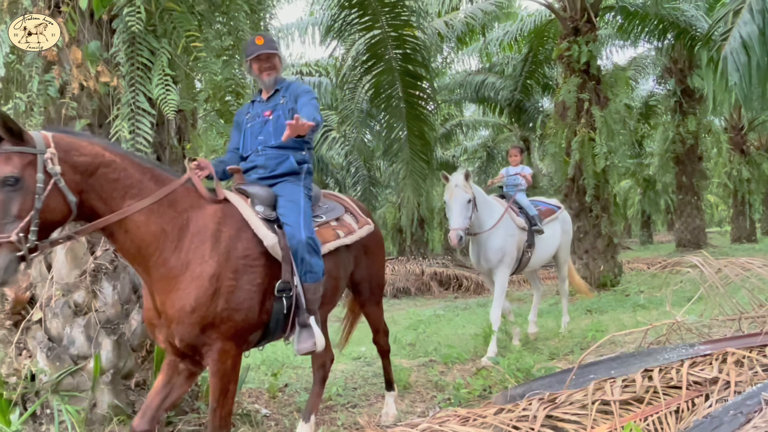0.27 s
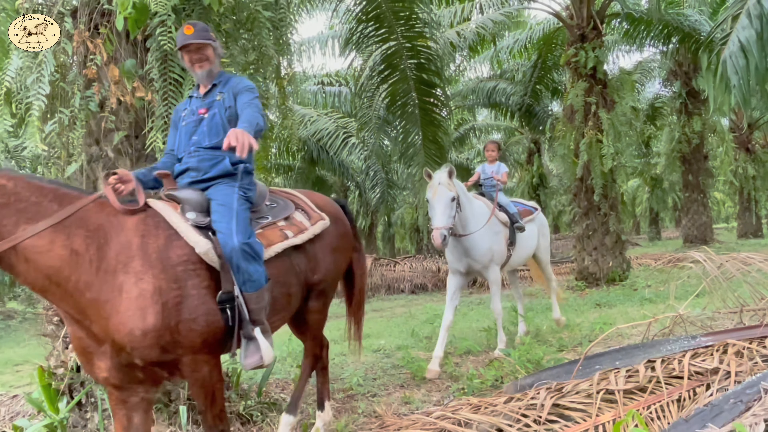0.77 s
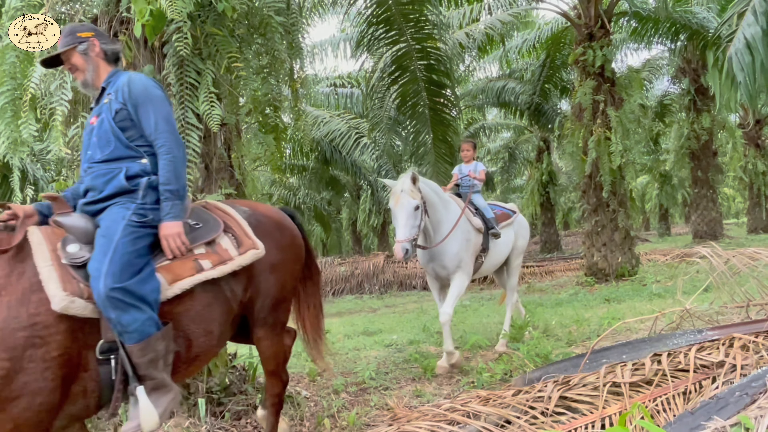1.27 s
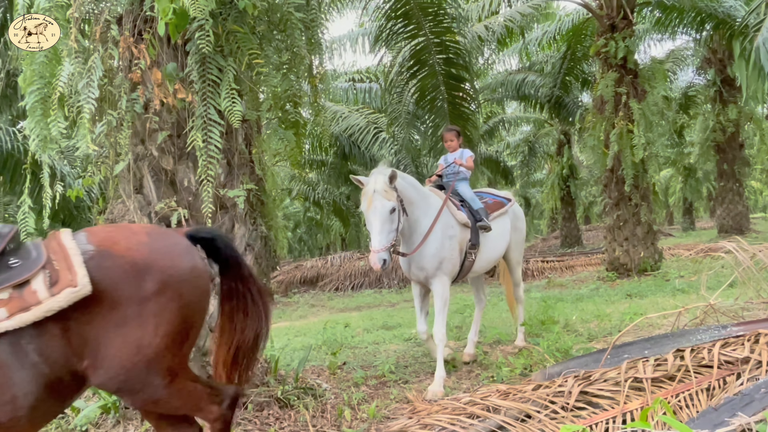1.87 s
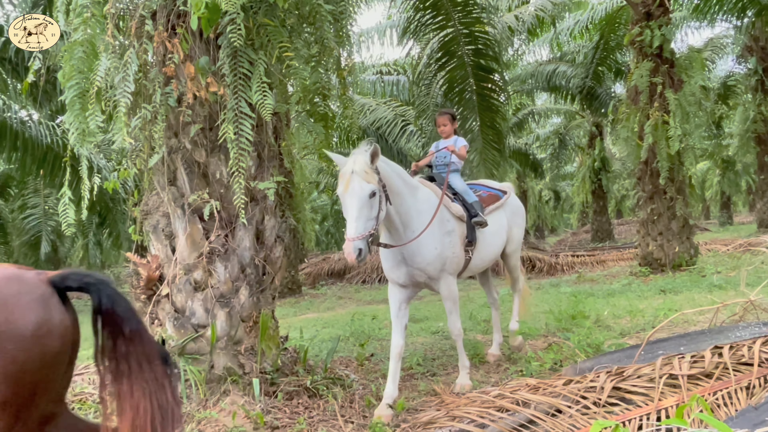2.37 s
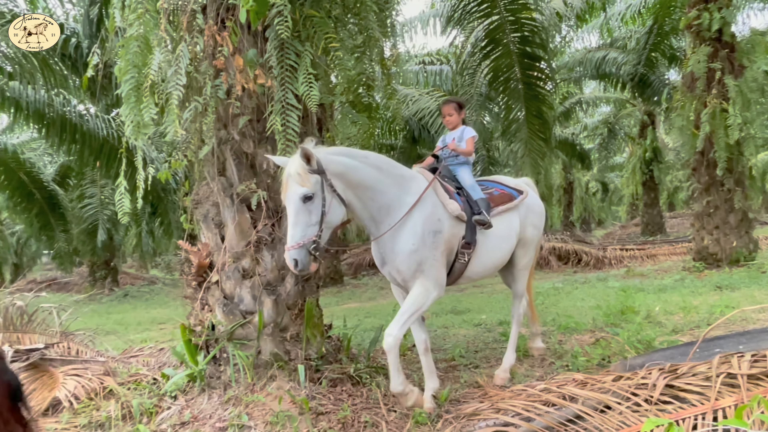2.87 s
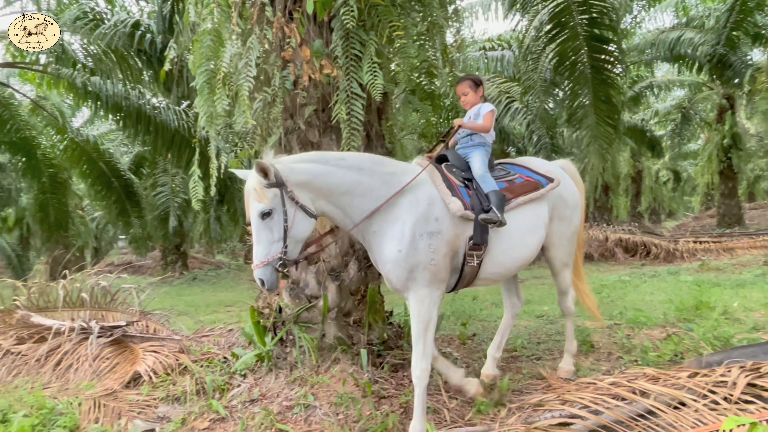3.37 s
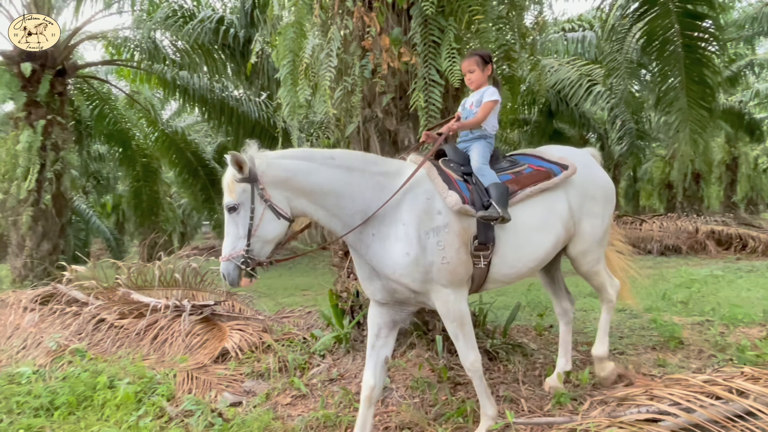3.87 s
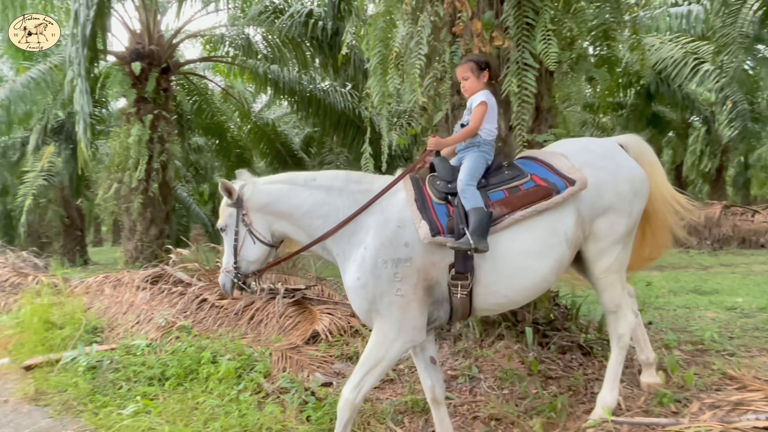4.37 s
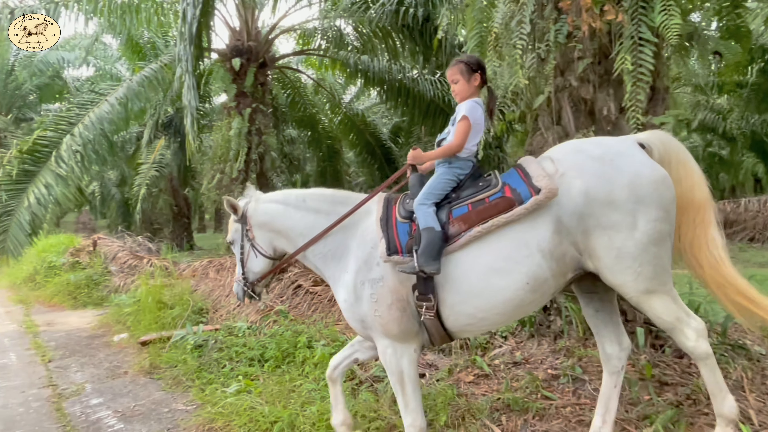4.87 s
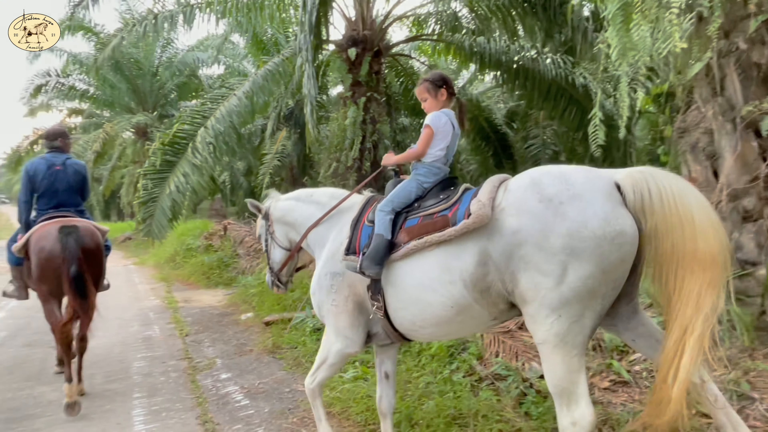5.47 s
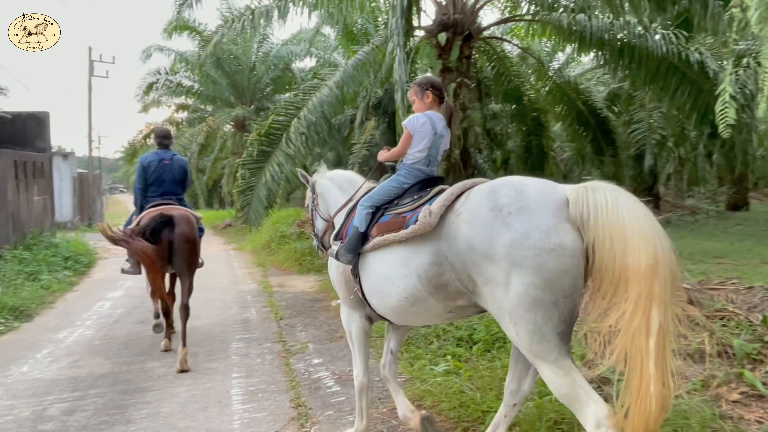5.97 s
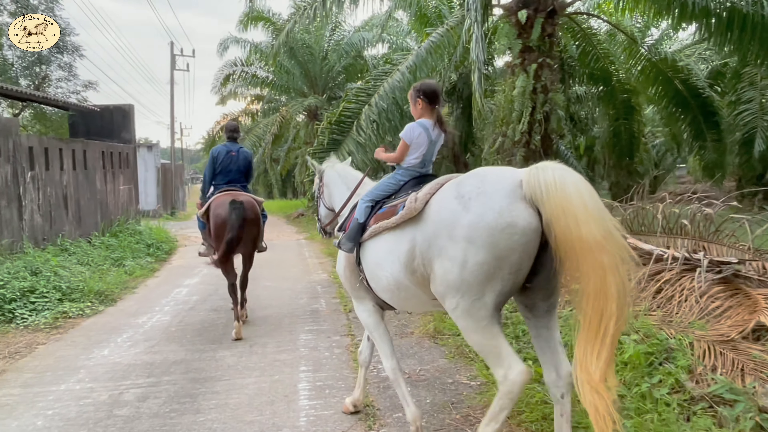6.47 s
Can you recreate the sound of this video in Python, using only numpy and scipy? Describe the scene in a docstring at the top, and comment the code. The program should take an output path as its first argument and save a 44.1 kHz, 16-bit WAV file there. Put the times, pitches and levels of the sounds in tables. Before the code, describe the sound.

Two horses walk past a stereo microphone in a palm grove, with a faint, low rumble wavering far off throughout. For the first two seconds their legs swish through grass and dry fronds, slightly to the left, and twigs snap, with a sharp crack near 0.8 seconds. A very faint, thin whistle sounds in the distance just after 1 second. From about 2 seconds the hooves land harder, thudding unevenly on soil, sliding over grit and crushing dry stems while the leaves keep rustling. From about 4 seconds the horses come out onto a paved lane, and the steps become hollow clops that ring slightly longer, mixed with crackles and short scrapes. The strongest clops fall near 4.7 and 6 seconds. Toward the end, around 6.5 seconds, the clops shift to the right and the bright rustle fades as the horses walk on.

```python
"""Two horses walk past a stereo microphone in a grove, with a low rumble far off throughout.
First their legs swish through grass and dry fronds and twigs snap; a faint whistle sounds in the distance.
From about 2 s the hooves land harder, thudding on soil, sliding over grit and crushing dry stems.
From about 4 s they come out onto a paved lane, where the hollow hooves ring longer as they clop.
At the end the clops move to the right and the top band fades as the horses walk off."""
import sys
import numpy as np
from scipy import signal
from scipy.fft import rfft, irfft
from scipy.io import wavfile
from scipy.ndimage import uniform_filter1d, map_coordinates

SR = 44100
rng = np.random.default_rng(int(sys.argv[2]) if len(sys.argv) > 2 else 0)


def pcm_store(signal):
    """Save signal as 16-bit PCM."""
    levels = np.round(np.clip(np.atleast_2d(signal), -1, 1) * 32767)
    wavfile.write(sys.argv[1], SR, levels.astype(np.int16).T)


N = 296793

PAVING_FROM_S = 3.9
# The bright colour of rustles and snaps as heard through the microphone.
# Each row: frequency in Hz, spectral level in dB.
RUSTLE_SPECTRUM = [(710, -18), (1200, -10.5), (1600, -14), (2400, -8.5), (3400, -9.5), (4700, -11.5),
                   (5900, -5), (7000, -7), (9300, -4), (10100, -2), (10700, 1), (11600, 2), (12600, -7.5),
                   (13300, -43), (16000, -9.5)]
# Grit stirring underfoot between the slides. Each row: time in seconds, level in dB.
SHUFFLE_LEVEL = [(0, -58), (.7, -59.5), (1.4, -52.5), (2.3, -58.5), (3.4, -58), (4.3, -58), (5.3, -46),
                 (5.5, -61), (5.66, -59), (6.15, -69.5), (6.4, -72.5), (6.73, -69)]


def thuds():
    """The ground swings a few times, its pitch sinking as the hoof settles; crushed soil roughens it."""
    # Weight landing. Each row: start in seconds, level in dB, first pitch in Hz, last pitch in Hz.
    landings = [(0.819, -37.5, 372, 172), (1.937, -17, 560, 134), (1.9507, -18, 413, 92),
                (2.587, -26, 640, 193), (2.596, -27.5, 450, 110), (2.763, -25.5, 560, 178),
                (2.864, -21, 680, 137), (2.929, -35.5, 300, 136), (3.199, -36.5, 560, 178),
                (3.365, -35.5, 413, 203), (3.486, -27, 630, 130), (4.069, -29.5, 630, 160),
                (4.431, -32, 540, 296), (4.449, -29, 304, 117), (4.46, -31.5, 231, 121),
                (4.622, -35.5, 540, 353), (4.663, -20, 560, 394), (4.684, -35, 254, 111),
                (5.004, -38, 246, 140), (5.06, -21.5, 440, 123), (5.079, -23.5, 430, 99),
                (5.092, -29, 150, 96), (5.159, -37, 476, 251), (5.267, -31, 634, 346),
                (5.282, -29.5, 207, 137), (5.296, -31.5, 171, 126), (5.627, -33, 635, 350),
                (5.634, -30.5, 580, 210), (5.676, -29.5, 254, 111), (5.698, -28.5, 284, 113),
                (5.714, -32, 199, 119), (5.799, -39.5, 298, 150), (5.883, -36.5, 480, 151),
                (5.901, -34.5, 297, 129), (6.0, -14.5, 625, 250), (6.014, -21, 330, 88.3),
                (6.044, -36, 200, 110), (6.251, -33.5, 247, 158), (6.324, -20, 460, 186),
                (6.379, -35, 348, 151), (6.43, -33.5, 246, 94), (6.467, -35, 254, 129),
                (6.682, -26, 277, 100), (6.696, -30, 232, 121)]
    sink_s, packed_hz, deep_hz = 0.0056, 455, 100
    out, t = np.zeros((2, N)), np.arange(round(.3 * SR)) / SR
    soil_band = signal.butter(2, [130, 600], "band", fs=SR, output="sos")
    jerk_band = signal.butter(2, 70, fs=SR, output="sos")
    for s, db, first_hz, last_hz in landings:
        noise = rng.standard_normal(len(t))
        lumps = rms_one(signal.sosfilt(jerk_band, noise[::-1]))   # the ground gives way in jerks
        pitch = last_hz + (first_hz - last_hz) * np.exp(-t / sink_s)
        swing = from_db(2.8 * lumps) * sine(pitch * (1 + 0.07 * lumps))
        soil = rms_one(signal.sosfilt(soil_band, noise))
        soil *= from_db(-3) * rise(t, 0.0017) * decay(t, 0.097)
        swings = 13.1 if s > PAVING_FROM_S else 14.5   # the lane stops the swing sooner
        thud = (swing + soil) * decay(t, swings / last_hz)
        # Packed earth knocks under the sole; the deep soil answers late.
        packed = from_db(-9.5 + 2.4 * lumps) * sine(packed_hz * (1 + 0.074 * lumps))
        deep = from_db(-10 + 1.9 * lumps) * sine(deep_hz * (1 + 0.18 * lumps))
        thud += packed * decay(t, 0.025) + deep * rise(t, 0.0093) * decay(t, 0.094)
        add(out, s, from_db(db) * rise(t, 0.00082) * thud)
    return out


def clops():
    """The hollow hoof rings briefly in two modes; grit under it keeps the ring going in uneven bursts."""
    # The hoof wall on hard ground. Each row: start in seconds, level in dB, pitch in Hz.
    knocks = [(1.949, -20.5, 930), (1.964, -26, 935), (2.137, -32.5, 875), (2.566, -26.5, 990),
              (2.596, -23.5, 690), (2.766, -24.5, 1330), (2.864, -18.5, 1180), (2.872, -25, 1300),
              (3.201, -14.5, 950), (3.226, -27, 840), (3.294, -32, 825), (3.368, -29, 900),
              (3.495, -11, 1030), (3.507, -32, 1050), (3.535, -35, 1050), (3.837, -23.5, 950),
              (4.078, -13.5, 1230), (4.124, -22.5, 1040), (4.196, -27.5, 840), (4.439, -25, 1210),
              (4.446, -32, 1200), (4.463, -25.5, 1010), (4.471, -29, 1000), (4.482, -25, 1020),
              (4.667, -24, 780), (4.672, -4.5, 1078), (4.688, -22.5, 1000), (4.696, -25, 1080),
              (4.706, -29, 1110), (4.717, -39, 1040), (4.783, -19, 1270), (5.057, -26, 790),
              (5.079, -11.5, 1140), (5.165, -19.5, 1010), (5.271, -24, 945), (5.28, -16.5, 1243),
              (5.636, -30, 1180), (5.641, -22.5, 870), (5.654, -31, 785), (5.691, -27.5, 1610),
              (5.673, -29, 1180), (5.702, -22, 980), (5.752, -31, 1050), (5.79, -28, 995),
              (5.819, -30.5, 920), (5.85, -33, 820), (5.881, -28, 966), (5.888, -28, 950),
              (5.897, -9, 1047), (5.917, -32, 1290), (5.931, -30, 1210), (5.941, -30, 1140),
              (5.946, -22.5, 1110), (5.985, -28, 930), (6.001, -9.5, 1207), (6.0032, -8, 971),
              (6.007, -23, 953), (6.013, -12.5, 940), (6.239, -32.5, 1000), (6.3, -30.5, 950),
              (6.327, -11.5, 1095), (6.346, -27, 1070), (6.379, -26, 755), (6.366, -35, 1040),
              (6.429, -38, 1000), (6.446, -37, 1010), (6.471, -23.5, 1120), (6.487, -34, 940),
              (6.536, -12.5, 1077), (6.548, -24, 1060), (6.557, -29, 1070), (6.606, -24.5, 1115),
              (6.676, -20, 1650), (6.679, -15, 1040), (6.685, -17, 1170), (6.694, -22, 905)]
    # The lead horse takes the lane to the right. Each row: time in seconds, left over right in dB.
    lean = [(0, 1.5), (4.8, 3.5), (5.7, 1), (6.73, -5)]
    soil_t60_s, paving_t60_s = 0.012, 0.022
    out, t = np.zeros((2, N)), np.arange(round(.2 * SR)) / SR
    for s, db, hz in knocks:
        noise, chance = rng.standard_normal((2, 2, len(t)))   # grit differs between left and right
        ring = np.sin(2 * np.pi * hz * t) + 0.27 * np.sin(2 * np.pi * 1.108 * hz * t)
        ring *= decay(t, paving_t60_s if s > PAVING_FROM_S else soil_t60_s)
        grind = rms_one(resonate(noise, 0.69 * hz, 0.2 * hz)) * from_db(-22) * decay(t, 0.035)
        grains = (chance[1] + noise[:, ::-1]) * (abs(chance[0]) > 2.6)   # a few hundred a second
        grain_ring = resonate(resonate(grains, 1.08 * hz, 0.24 * hz), 1.07 * hz, 0.26 * hz)
        grind += rms_one(grain_ring) * from_db(-28) * decay(t, 0.099)
        knock = rise(t, 0.0016, power=2) * (ring + grind)
        add(out, s, from_db(db) * knock / abs(knock).max())
    lean_db, = in_time(lean)
    return out * from_db([lean_db / 2, -lean_db / 2])


def snaps():
    """A twig's fibres tear, break and die away at once: a woody body and a bright top."""
    # Twigs and grit cracking. Each row: time in seconds, level in dB, extra gain of the top in dB,
    # pitch of the body in Hz.
    cracks = [(.018, -51.5, 23, 6450), (0.2132, -33.5, 11.5, 2500), (.395, -33.5, 8.5, 6100),
              (0.474, -46, 19, 2870), (0.6674, -34.5, 10, 1910), (0.7194, -36.5, 11, 3100),
              (0.7884, -46, 11, 3580), (0.8188, -16, 6, 2800), (0.9083, -26, 9, 3760),
              (0.915, -33, 4, 3500), (0.9315, -28.5, 12.5, 3540), (0.938, -31, 4, 3500),
              (.951, -36, 2, 3500), (1.035, -39, 9, 3500), (1.5263, -23, -11, 5660), (1.579, -41, 17, 3000),
              (1.662, -31, 6, 9700), (1.8065, -27, -1, 7400), (1.827, -33, -4, 6500),
              (1.934, -24, -10, 2770), (1.9385, -18.5, 1, 2550), (1.939, -18.5, -20, 5600),
              (1.9495, -14, -24, 2570), (2.1305, -31, 5, 5000), (2.136, -20, 1, 2640),
              (2.138, -31, -10, 5300), (2.181, -27.5, 4.5, 2000), (2.303, -39, 11, 4220),
              (2.327, -24, 4, 6500), (2.5635, -18, -1, 2400), (2.596, -24.5, -25, 2360),
              (2.639, -42, 19, 2570), (2.716, -35.5, -8, 1890), (2.7648, -20, 6.5, 2950),
              (2.8654, -24, 4, 2500), (2.887, -43, -13, 2000), (3.046, -25, -21, 3760),
              (3.1284, -32.5, 8, 2500), (3.1996, -19.5, -10, 2420), (3.227, -26, 5.5, 2420),
              (3.2928, -33.5, 8, 2760), (3.2995, -37, -14, 2840), (3.3664, -30, 12.5, 2760),
              (3.367, -25, -22, 1480), (3.4943, -19, -8, 2600), (3.581, -29, -29, 2600),
              (3.802, -31, -12, 2480), (3.813, -20.5, -19, 2420), (3.826, -22, -21, 2490),
              (3.837, -25.5, 6, 2495), (3.857, -34, -10, 2500), (3.873, -31, -10, 2500),
              (3.896, -23, -9, 2660), (3.9034, -23.5, 3.5, 2600), (3.919, -35, -10, 1900),
              (3.941, -29, -15, 2080), (3.949, -33, -14, 3000), (3.974, -24.5, 5.5, 2850),
              (3.991, -30, -5.5, 2640), (4.073, -23, -15, 2550), (4.08, -22.5, -18, 2500),
              (4.1206, -29, 8, 2600), (4.136, -27, -1, 1690), (4.168, -31, -10, 2860),
              (4.193, -29, -16, 2340), (4.368, -37, 11.5, 2440), (4.4379, -14, -25, 5850),
              (4.4386, -20.5, -11, 2570), (4.4515, -28, -16, 5750), (4.446, -23.5, -21, 2480),
              (4.4542, -18, -20, 2440), (4.622, -32.5, -20, 2680), (4.666, -25, -15, 2560),
              (4.6727, -18.5, -27, 2630), (4.7586, -28, -2, 2660), (4.781, -10, -2.5, 2450),
              (4.799, -29, -10, 2570), (4.8126, -23.5, -4, 2360), (4.927, -34.5, -16.5, 1510),
              (4.9268, -31.5, 13, 2900), (5.007, -24.5, -1.5, 2330), (5.0175, -31.5, 3, 2330),
              (5.0585, -41, 22, 3300), (5.0776, -13, -14, 1780), (5.157, -40, 15.5, 3000),
              (5.1636, -10.5, -9.5, 2170), (5.165, -18.5, -22, 3350), (5.178, -25, -12, 2530),
              (5.219, -33, -15, 1800), (5.2722, -23, -11, 2260), (5.3713, -26, 4, 2660),
              (5.636, -17, -28, 3700), (5.6429, -15, -25, 2560), (5.654, -28, -20.5, 2300),
              (5.674, -24, -7, 2500), (5.693, -21.5, -4, 2620), (5.741, -23, -15, 2600),
              (5.75, -20, -11, 3400), (5.7889, -16.5, -17, 2260), (5.79, -32, -10, 3580),
              (5.818, -23, -5, 2500), (5.896, -23.5, -27, 2620), (5.946, -35, -18, 2450),
              (5.9738, -30, 6, 2620), (6.0013, -15, -25, 2250), (6.003, -15.5, -14, 6830),
              (6.006, -19, -20, 1680), (6.0138, -21, -21, 2520), (6.238, -45, 20.5, 2480),
              (6.27, -36, -12, 2180), (6.3265, -23, -10, 1730), (6.327, -33, -15, 3370),
              (6.3416, -37, -6, 2450), (6.368, -27.5, -5, 3420), (6.4294, -26, -20.5, 2230),
              (6.444, -34, 0, 1500), (6.475, -31, -10, 2430), (6.495, -37, -13.5, 2280),
              (6.6175, -34, 10, 2350), (6.6552, -28.5, -31, 2420), (6.679, -23, -18, 2370),
              (6.697, -29, 0, 2900)]
    tear_s, body_t60_s, top_t60_s = .0014, 0.013, 0.015
    body, top = np.zeros((2, 2, N))
    t = np.arange(round(.08 * SR)) / SR
    for s, db, top_db, hz in cracks:
        noise = rng.standard_normal((3, len(t)))
        burst = np.tanh(noise[0] + 0.64 * noise[1:]) * rise(t, tear_s, power=2)
        burst[:, round(tear_s * SR)] += 1.93   # the click of the break itself
        tear = burst * decay(t, body_t60_s)
        wood = resonate(resonate(tear, hz, .27 * hz), hz, .27 * hz)
        knock = wood + .3 * resonate(tear, 1.06 * hz, 0.68 * hz)   # a broad band of splintering
        add(body, s - tear_s / 2, from_db(db) * knock / abs(knock).max())
        add(top, s - tear_s / 2, from_db(db + top_db) * decay(t, top_t60_s) * 2 * burst)
    softened = signal.lfilter([1, 0.45], [1], top)
    return body + coloured(softened, RUSTLE_SPECTRUM) * top.std()


def leg_swishes():
    """Legs sweep through dry leaves, which crackle densely and rustle on between the sweeps."""
    # Each row: loudest moment in seconds, level in dB, swell in seconds, fade in seconds.
    sweeps = [(.17, -35, 0.33, 0.078), (.42, -35, 0.18, 0.31), (.87, -35, 0.021, 0.071),
              (.905, -23.5, 0.05, 0.029), (.94, -27.5, .02, 0.082), (1.52, -34.5, 0.031, 0.089),
              (1.57, -31.5, 0.086, 0.012), (1.85, -26, 0.12, 0.12), (1.95, -32.5, 0.095, 0.12),
              (2.14, -31.5, 0.015, 0.13), (2.43, -33.5, 0.33, 0.13), (2.62, -37.5, 0.15, 0.18),
              (2.78, -34.5, 0.016, 0.025), (2.94, -29, 0.016, 0.028), (3.06, -36, 0.085, 0.17),
              (3.22, -41, 0.027, 0.054), (3.85, -32, 0.033, 0.21), (4.1, -27, 0.035, 0.099),
              (4.46, -35.5, 0.19, 0.83), (4.76, -36, 0.081, 0.12), (4.99, -29.5, 0.027, 0.042),
              (5.07, -29, 0.02, 0.033), (5.65, -46, 0.018, .1), (5.78, -31.5, 0.089, 0.17),
              (6.01, -28.5, 0.03, 0.025), (6.23, -35.5, 0.025, 0.11), (6.34, -32, 0.21, 0.047),
              (6.46, -33, 0.034, 0.059), (6.64, -38, 0.03, 0.46)]
    # Leaves between the sweeps. Each row: time in seconds, level in dB.
    rustle = [(0, -74), (.28, -56), (.65, -43.5), (1.2, -38), (1.4, -42.5), (2.8, -49.5), (3.28, -43.5),
              (3.5, -38), (3.8, -37.5), (4.2, -55), (5.2, -33.5), (5.55, -44), (6.1, -68), (6.73, -55)]
    return litter(RUSTLE_SPECTRUM, swells(sweeps, in_time(rustle)[0]),
                  per_s=2500, spread_db=3.0, hiss=0.056, flicker_db=8.5, wide=2.62, patch_db=2.0)


def frond_drags():
    """A dry frond sings near one pitch as it is dragged."""
    # Each row: loudest moment in seconds, level in dB, swell in seconds, fade in seconds.
    drags = [(.4, -43, .1, 0.061), (.59, -44, 0.046, 0.031), (.87, -37, 0.027, 0.065),
             (1.53, -43, 0.033, 0.054), (1.87, -36, 0.048, 0.046), (2.42, -38.5, 0.065, 0.052),
             (3.09, -41, 0.016, 0.059), (4.45, -38, .01, .02), (4.98, -44, .02, .03),
             (6.01, -33.5, 0.041, 0.03), (6.26, -43.5, .03, .06)]
    # The frond's narrow band. Each row: frequency in Hz, spectral level in dB.
    spectrum = [(4300, -30), (5300, -13), (6000, 8), (6700, -2), (8000, -61)]
    return litter(spectrum, swells(drags, -71),
                  per_s=1200, spread_db=4.5, hiss=0.11, flicker_db=-4.0, wide=1.0, patch_db=0.5)


def scuffs():
    """A hoof slides over soil and grit in a short, dull scrape."""
    # Each row: loudest moment in seconds, level in dB, fade in seconds (taken as 5 ms at least).
    slides = [(.87, -41, 0), (1.94, -45, -0.06), (2.16, -41, 0.08), (2.59, -50, 0.46), (2.91, -50, 1),
              (3.214, -38.5, 0.07), (3.3, -52, -0.5), (3.5, -38, 0), (3.584, -40.5, 0.05),
              (3.81, -40, 0.23), (4.09, -38.5, 0.17), (4.447, -35.5, 0.09), (4.56, -50.5, 16),
              (4.671, -44, 0.83), (4.81, -38.5, 0.006), (5.039, -33, -0.13), (5.272, -36, -0.03),
              (5.642, -41, 0.16), (5.79, -47.5, 0.15), (5.886, -33.5, 0.03), (5.985, -41, 0.006),
              (6.013, -24, -0.02), (6.25, -42.5, 0.06), (6.32, -43, 0), (6.44, -37.5, 0.2),
              (6.52, -34.5, 0.006), (6.688, -25.5, -0.15)]
    # The scrape's dull colour. Each row: frequency in Hz, spectral level in dB.
    spectrum = [(88, -29), (150, 1.5), (351, -1.5), (632, -2.5), (710, -1), (1030, 2), (1240, -0.5),
                (1750, -2.5), (2580, -3.5), (3360, -20.5), (4510, -18.5), (5000, -60), (6500, -53),
                (11000, -120)]
    swell_s = 0.017
    scrapes = [(s, db, swell_s, fade) for s, db, fade in slides]
    return litter(spectrum, swells(scrapes, in_time(SHUFFLE_LEVEL)[0]),
                  per_s=1500, spread_db=4.0, hiss=0.52, flicker_db=6.0, wide=1.8, patch_db=4.5)


def crunches():
    """Dry stems are crushed under the sole, and crackle faintly between the steps."""
    # Each row: loudest moment in seconds, level in dB, swell in seconds, fade in seconds.
    crushes = [(.13, -45, .03, 0.032), (.88, -40, 0.027, 0.15), (1.96, -40, 0.016, 0.045),
               (2.15, -42, .01, 0.079), (2.58, -56, .02, 0.059), (2.94, -46, 0.017, 0.029),
               (3.215, -40, 0.011, 0.028), (3.3, -51, .01, 0.034), (3.38, -50, .01, 0.032),
               (3.5, -47, 0.036, 0.035), (3.85, -51, 0.031, 0.092), (4.1, -42, 0.029, 0.068),
               (4.45, -42.5, .015, 0.034), (4.68, -51, 0.018, 0.025), (4.8, -43, .03, .05),
               (5.01, -50, .02, .03), (5.18, -51, .01, .04), (5.66, -48, 0.017, 0.09),
               (5.95, -47, .02, .03), (6.02, -37, 0.05, 0.033), (6.46, -56, 0.027, 0.04),
               (6.68, -50, 0.024, 0.051)]
    # The crunch's narrow band near 2.6 kHz, where the microphone rings.
    # Each row: frequency in Hz, spectral level in dB.
    spectrum = [(1300, -49), (1900, -2), (2300, -3.5), (2600, 5.5), (2950, -7.5), (3500, -27), (5000, -45)]
    between_db = in_time(SHUFFLE_LEVEL)[0] - 10
    stems = crackle(per_s=640, spread_db=2.5, hiss=0.2) + 0.68 * rng.standard_normal((2, N))
    return from_db(swells(crushes, between_db)) * coloured(stems, spectrum)


def grove(x):
    """A smeared echo off the nearest trunk and scatter from the others; thin trunks return no bass."""
    echo_s, scatter_t60_s = 0.028, 0.13
    t = np.arange(round(.3 * SR)) / SR
    echo = from_db(-39 - 13000 * (t - echo_s).clip(0)) * (t >= echo_s)
    scatter = from_db(-35.5) * decay(t, scatter_t60_s) * (t > .005)
    band = signal.butter(1, [350, 16000], "band", fs=SR, output="sos")
    response = signal.sosfilt(band, (echo + scatter) * rng.standard_normal((2, len(t))))
    return signal.fftconvolve(x, response, axes=1)[:, :N]


def far_whistle():
    """A faint, thin whistle in the distance: a narrow band of noise that swells twice."""
    # Each row: loudest moment in seconds, level in dB, swell in seconds, fade in seconds.
    notes = [(1.1, -50.5, 0.056, 0.1), (1.25, -51, .1, .06)]
    # The whistle's band. Each row: frequency in Hz, spectral level in dB.
    spectrum = [(1900, -58), (2130, -12), (2200, -4), (2270, -15), (2500, -50)]
    return from_db(swells(notes, -120)) * coloured(rng.standard_normal(N), spectrum)


def far_rumble():
    """Low noise from far off wavers slowly, nearly the same on both sides."""
    # The rumble's colour. Each row: frequency in Hz, spectral level in dB.
    spectrum = [(15, -45), (25, -16), (42, -9), (81, 0), (124, -6), (158, -11), (230, -16.5), (301, -16.5),
                (372, -18), (900, -23.5), (1170, -66), (1980, -120)]
    # Its course. Each row: time in seconds, level in dB.
    level = [(0, -48), (.4, -52.5), (1.2, -51), (2.4, -51.5), (3.8, -53), (6.73, -52)]
    noise = rng.standard_normal(N) * from_db(4.1 * drift(2.7)) + 0.17 * rng.standard_normal((2, N))
    return from_db(in_time(level)[0]) * coloured(noise, spectrum)


def microphone_ports(x):
    """The right port is mostly further from the horses; the top band reaches both alike but for phase."""
    # Where the horses are. Each row: time in seconds, lead of the left port in ms,
    # left over right in dB before weighting by frequency, gain of the top band in dB.
    bearing = [(0, 0.11, 2.5, 1), (.7, 0.13, 3.5, -0.5), (1.4, 0.14, 5.5, 1), (2.2, 0.13, 2.5, -0.5),
               (2.8, 0.42, 4, -1), (3.5, 0.42, 2, -2.5), (4.1, 0.41, 2, -1.5), (4.7, 0.35, 2, -1),
               (5.8, 0.138, 2, -2), (6.2, -0.18, 1, 0), (6.5, 0.38, 3, -1.5), (6.73, 0.39, 2, -10.5)]
    # How strongly each band leans to one side. Each row: frequency in Hz, weight of the panned sound.
    lean = [(60, 0.48), (250, 0.94), (1000, 0.75), (1650, -0.021), (2600, 0.33), (3600, 2.08), (5800, 1.14),
            (7000, 0.66), (8000, -1.7), (9000, 0.011)]
    # The housing turns the phase between the ports. Each row: frequency in Hz, angle in radians.
    housing_phase = [(9000, 0.17), (9730, 2.71), (10400, 3.01), (11800, 6.5)]
    lead_ms, pan_db, top_db = in_time(bearing)
    right = map_coordinates(x[1], [np.arange(N) - lead_ms * SR / 1000], order=3)
    both = np.array([x[0], right])
    hz = np.fft.rfftfreq(N, 1 / SR)
    weight = np.interp(hz, *np.transpose(lean))
    heard = weight * rfft(both * from_db([pan_db / 2, -pan_db / 2])) + (1 - weight) * rfft(both)
    turn = np.exp(.5j * np.outer([-1, 1], np.interp(hz, *np.transpose(housing_phase))))
    centred = rfft(from_db(top_db) * x.mean(axis=0)) * turn
    top = hz > 9200
    heard[:, top] = centred[:, top] + 0.047 * heard[:, top]
    return irfft(heard, N)


def litter(spectrum, level_db, per_s, spread_db, hiss, flicker_db, wide, patch_db):
    """One near stream of crackle for both ports, plus a wide share of noise that each hears alone."""
    near = crackle(per_s, spread_db, hiss) * from_db(flicker_db * np.tanh(drift(40)))
    stereo = near + wide * rng.standard_normal((2, N))
    return from_db(level_db) * coloured(patchy(stereo, patch_db), spectrum)


def crackle(per_s, spread_db, hiss):
    """Uneven clicks in clumps over a share of plain hiss."""
    sizes = from_db(spread_db * np.minimum(rng.exponential(1, N), 4.0)) * rng.choice([-1, 1], N)
    clicks = sizes * (rng.random(N) < per_s * from_db(3 * np.tanh(drift(40))) / SR)
    return rms_one(clicks) + hiss * rng.standard_normal(N)


def patchy(x, patch_db):
    """Each leaf has its own colour: patches about 1 kHz wide and 30 ms long come and go."""
    cells = signal.stft(x, nperseg=256)[2]
    field = rng.standard_normal(cells.shape[1:])
    for _ in range(2):
        field = uniform_filter1d(uniform_filter1d(field, size=5, axis=0), size=8, axis=1)
    return signal.istft(cells * from_db(patch_db * rms_one(field)), nperseg=256)[1][:, :N]


def swells(rows, between_db):
    """Level in dB of peaks summed in power over a bed; swell and fade are each the time for 10 dB."""
    t = np.arange(0, N, 40) / SR
    power = sum(from_db(db - 10 * np.maximum((s - t) / max(swell, .005), (t - s) / max(fade, .005))) ** 2
                for s, db, swell, fade in rows)
    return 10 * np.log10(np.interp(np.arange(N) / SR, t, power) + from_db(between_db) ** 2)


def drift(rate_hz):
    """A slow random wander, spread 1."""
    pole = np.exp(-80 * np.pi * rate_hz / SR)
    slow = signal.lfilter([1], [1, -2 * pole, pole * pole], rng.standard_normal(N // 40 + 2002))[2000:]
    return np.interp(np.arange(N) / 40, np.arange(len(slow)), rms_one(slow))


def coloured(x, spectrum):
    """Filter by rows of Hz and dB, then scale to rms 1."""
    hz, db = np.transpose(spectrum)
    grid = np.fft.rfftfreq(2 ** 19, 1 / SR) + 1
    gain = from_db(np.interp(np.log(grid), np.log(hz), db))
    return rms_one(irfft(rfft(x, 2 ** 19) * gain)[..., :N])


def resonate(x, hz, width_hz):
    """One resonance, gain 1 at its peak."""
    r = np.exp(-np.pi * width_hz / SR)
    feedback = [1, -2 * r * np.cos(2 * np.pi * hz / SR), r * r]
    return signal.lfilter([(1 - r * r) / 2, 0, (r * r - 1) / 2], feedback, x)


def sine(hz):
    """A sine that follows a moving pitch."""
    return np.sin(2 * np.pi * np.cumsum(hz) / SR)


def rise(t, rise_s, power=1):
    """An onset from 0 towards 1."""
    return 1 - np.exp(-(t / rise_s) ** power)


def decay(t, t60_s):
    """A fall of 60 dB every t60_s."""
    return from_db(-60 * t / t60_s)


def from_db(db):
    """Level to gain."""
    return 10 ** (np.asarray(db) / 20)


def rms_one(x):
    """Scale to rms 1."""
    return x / np.sqrt(np.mean(x ** 2) + 1e-20)


def in_time(rows):
    """Each column of a curve, sample by sample."""
    s, *columns = np.transpose(rows)
    return [np.interp(np.arange(N) / SR, s, column) for column in columns]


def add(out, s, sound):
    """Mix a short sound in at s seconds."""
    i = round(s * SR)
    out[:, i:i + sound.shape[-1]] += sound[..., :N - i]


def scene():
    """Steps, their echoes and the litter underfoot at the microphone, with the far sounds behind."""
    steps = thuds() + clops() + snaps()
    underfoot = crunches() + leg_swishes() + frond_drags() + scuffs()
    return far_rumble() + microphone_ports(steps + underfoot + far_whistle() + grove(steps))


def record(dry):
    """The microphone's bass falls away and the top is cut."""
    bass_cut_hz, top_cut_hz = 28, 16500
    thinned = signal.sosfilt(signal.butter(2, bass_cut_hz, "high", fs=SR, output="sos"), dry)
    return signal.sosfilt(signal.cheby2(12, 70, top_cut_hz, fs=SR, output="sos"), thinned)


dry = scene()
out = record(dry)
pcm_store(out)
```